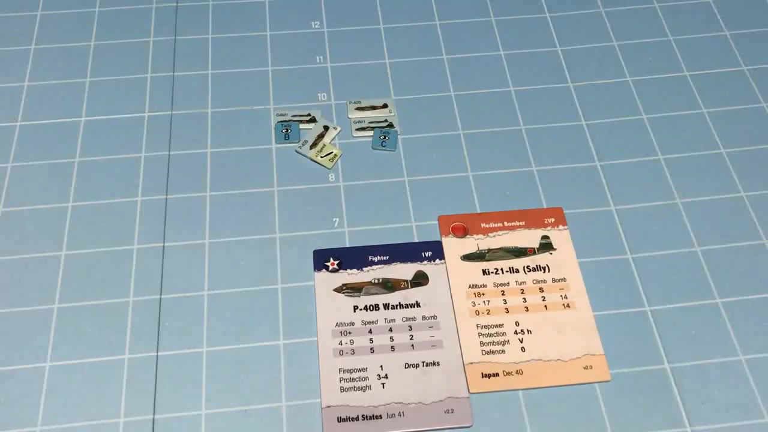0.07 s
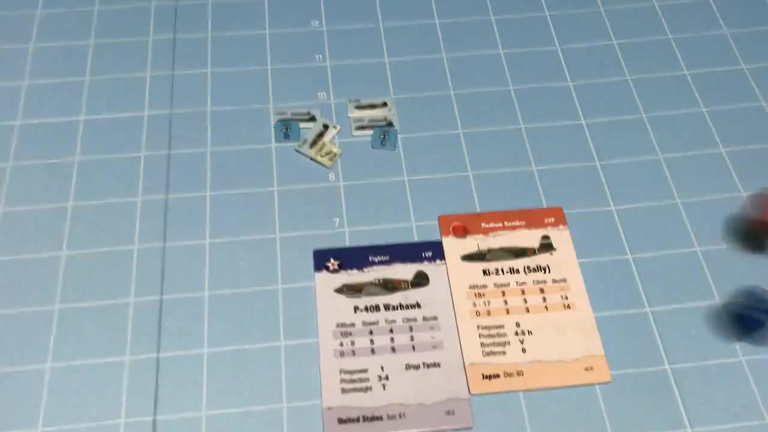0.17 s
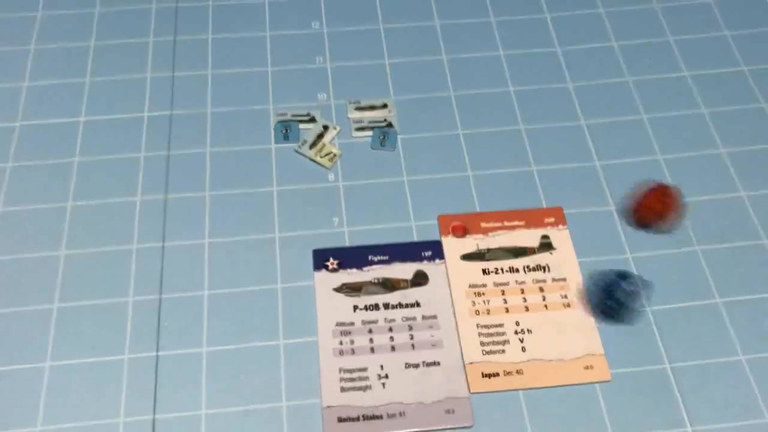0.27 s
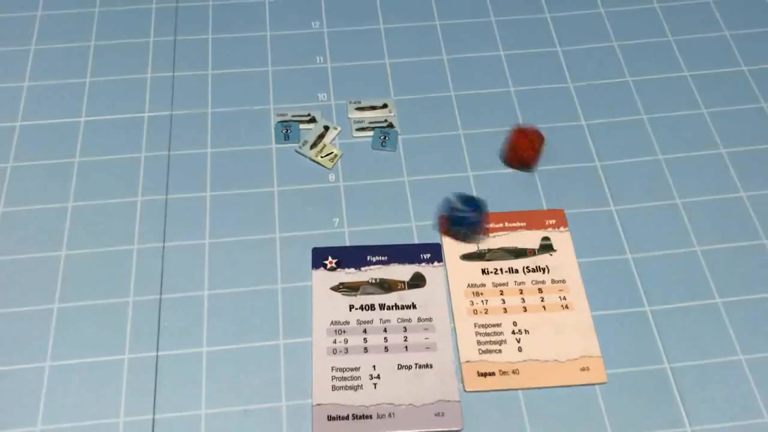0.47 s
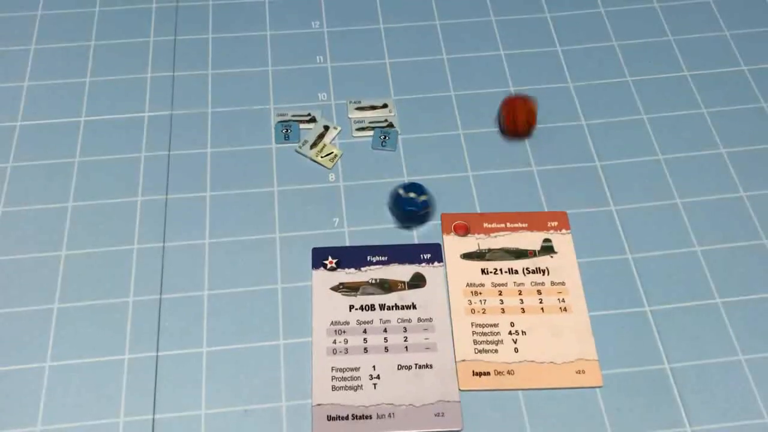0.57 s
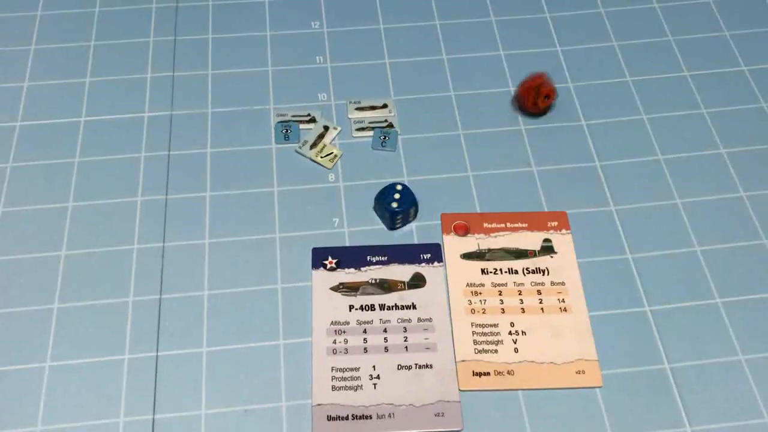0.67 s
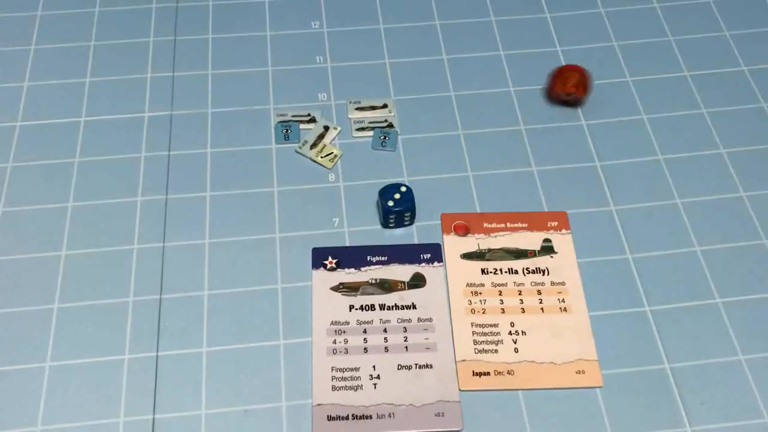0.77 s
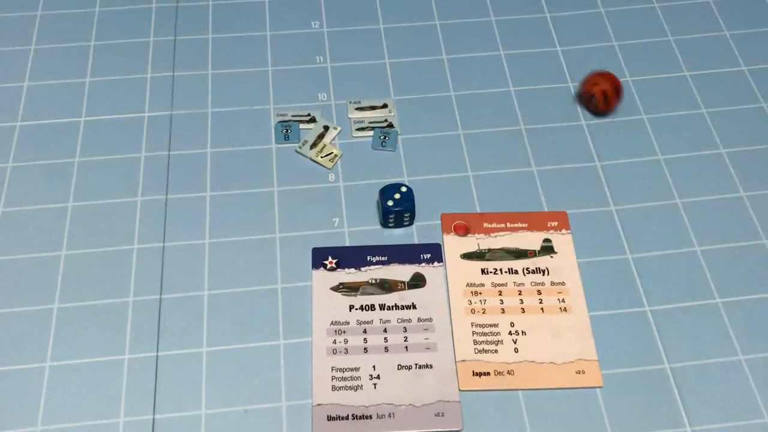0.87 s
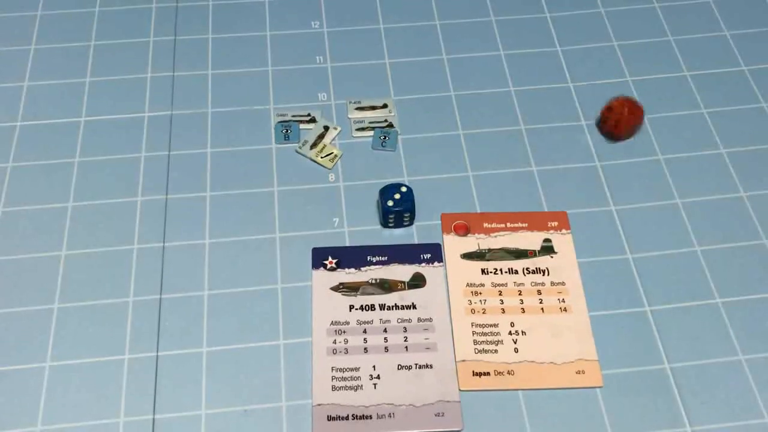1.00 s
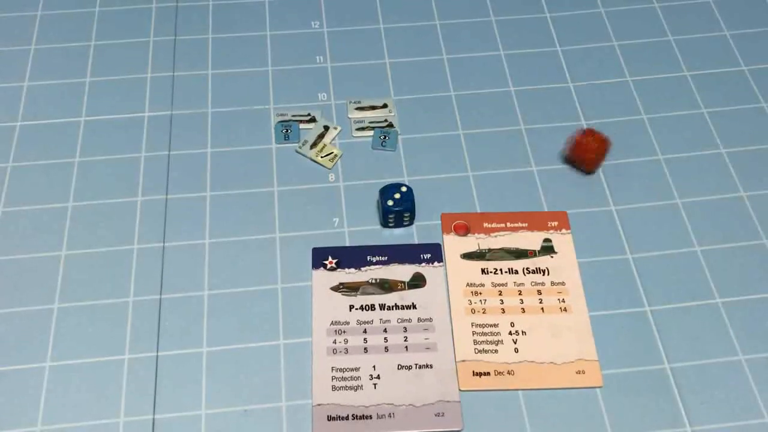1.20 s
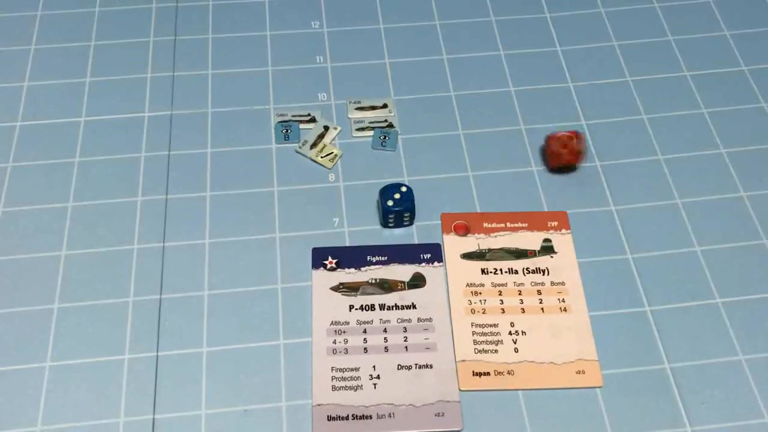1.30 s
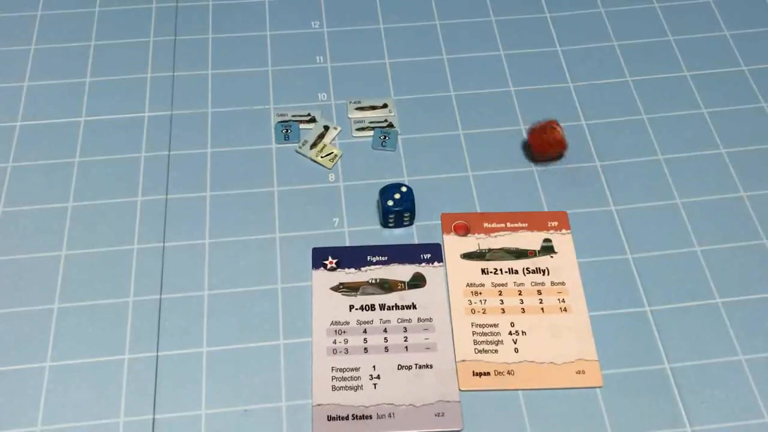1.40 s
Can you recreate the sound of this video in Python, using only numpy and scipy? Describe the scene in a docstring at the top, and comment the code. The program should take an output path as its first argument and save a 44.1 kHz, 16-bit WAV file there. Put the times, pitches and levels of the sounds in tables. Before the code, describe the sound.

Two dice click together, then bounce and tumble to rest on a table mat.

```python
"""Two plastic dice click together in a closed hand, whose cavity colours the clicks and rings on.
Thrown on a thin mat over a table, they skid, bounce with hollow knocks and tumble over their corners;
one rocks on slowly until it drops on a face. Each landing sends bending waves through the table top
and excites its low modes. A small room reflects the blows, and a faint mains hum lies under it all."""
import sys
import numpy as np
from scipy import signal
from scipy.fft import rfft, irfft
from scipy.io import wavfile

SR = 44100
rng = np.random.default_rng(int(sys.argv[2]) if len(sys.argv) > 2 else 0)


def master_out(mix):
    """Clip the mix to full scale and print it as 16-bit PCM to the path in sys.argv[1]."""
    frames = np.transpose(np.atleast_2d(mix))
    ceiling = np.clip(frames, -1, 1)
    pcm = np.round(ceiling * 32767).astype(np.int16)
    wavfile.write(sys.argv[1], SR, pcm)


N = 63945
T = np.arange(N) / SR
KNOCK_HZ, TREBLE_HZ, TOP_HZ = 900, 1432, 16400  # nominal knock pitch, corner of its tilt, band limit

# Spectrum of a knock through the mat. Each row: frequency in Hz, level in dB.
KNOCK_SPECTRUM = [(25, -36), (70, -12), (130, -16.5), (290, -9), (440, -18), (620, -9), (900, 3.5),
                  (1350, -6), (1850, -13.5), (2700, -20.5), (4500, -30.5), (8000, -38), (16000, -53)]


def undb(db):
    """Amplitude grows tenfold for every 20 dB."""
    return 10 ** (np.asarray(db) / 20)


def decay(t, t60):
    """Damping is exponential: 60 dB are lost in t60 seconds."""
    return np.exp(-np.log(1000) * t / t60)


def bin_hz(size):
    """Fourier bins lie SR / size apart; the lowest is held at 1 Hz for log axes."""
    return np.maximum(np.arange(size // 2 + 1) * SR / size, 1)


def curve(points, hz):
    """A spectral envelope runs straight between points on a log-frequency axis."""
    point_hz, point_db = np.array(points).T
    return np.interp(np.log(hz), np.log(point_hz), point_db)


def noise(points, size=2 ** 17):
    """Filtered white noise takes on the spectrum of its filter; rms 1."""
    x = irfft(rfft(rng.standard_normal(size)) * undb(curve(points, bin_hz(size))))[:N]
    return x / x.std()


def add(out, x, start):
    """Superposition: x adds to the sound from its start in seconds."""
    i = round(start * SR)
    out[i:i + len(x)] += x[:N - i]


def impact(points, shift, corner_hz, tilt_db, thud_db=0, ring_db=0, size=4096):
    """A blow is a minimum-phase pulse of peak 1; a harder contact tilts the treble up."""
    hz = bin_hz(size)
    db = curve(points, hz / shift) + tilt_db * np.log2(np.hypot(1, hz / corner_hz))
    db += thud_db * np.exp(-.5 * (np.log2(hz / 335) / 0.38) ** 2)  # hollow thud around 335 Hz
    db += ring_db * np.exp(-.5 * (np.log2(hz / shift / KNOCK_HZ) / 0.15) ** 2)
    cepstrum = irfft(np.log(undb(db)))
    cepstrum[1:size // 2] *= 2  # folding onto positive time makes the pulse causal
    cepstrum[size // 2 + 1:] = 0
    x = irfft(np.exp(rfft(cepstrum)))
    return -x / np.abs(x).max()


def room(x, tail_db, size=16384):
    """Reverberation: early reflections and a diffuse tail, new at each spot, follow the direct sound."""
    # Diffuse ring of table and room. Each row: band centre in Hz, level in dB re tail_db, t60 in seconds.
    bands = [(97.3, -7, 0.9), (298.4, -12.5, 0.239), (594, 4.5, 0.13), (880, -8.5, 0.17),
             (1623, -6.5, 0.16), (3500, -7.5, 0.15), (6500, -4, 0.14), (14700, -21, .22)]
    # Reflections from nearby surfaces. Each row: delay in seconds, level in dB.
    echoes = [(.0015, -17.5), (.0086, -29), (0.0094, -30), (0.0146, -18), (.0143, -23)]
    t, log_hz = T[:size], np.log(bin_hz(size))
    white, response = rfft(rng.standard_normal(size)), np.zeros(size)
    centres = np.log([row[0] for row in bands])
    for pick, (_, db, t60) in zip(np.eye(len(bands)), bands):
        band = irfft(white * np.interp(log_hz, centres, pick))
        envelope = decay(t, t60) * (1 - np.exp(-t / 0.0017))
        response += undb(db + tail_db) * band * envelope / np.linalg.norm(envelope)
    response[0] += 1
    for delay, db in echoes:
        response[int(delay * SR)] += undb(db)
    return signal.fftconvolve(x, response)


def clacks():
    """Brief contact of die on die gives a bright click; the hand's cavity resonates until it opens."""
    # Collisions. Each row: start in seconds, level in dB, treble tilt in dB per octave, pitch in Hz.
    collisions = [(.0006, -35.5, 1, 6250), (0.0245, -24, -1.5, 6370), (.0695, -48.5, -3, 5300),
                  (0.1081, -38.5, -7.5, 5600), (0.1892, -5, 1, 6570), (0.2323, -40, -36, 6200),
                  (.3800, -42, 4.5, 6640), (0.398, -27.5, 20, 6760)]
    # Spectra of the click, the hand's colouring and its ring. Each row: frequency in Hz, level in dB.
    plastic = [(200, -53.5), (1600, -51), (2600, -33), (3500, -21.5), (4500, -13), (6400, -4), (7900, -6.5),
               (9600, -5.5), (12200, -20), (14500, -20.5), (16000, -25)]
    hand_colour = [(1500, 2.5), (2900, 12.5), (4500, -1.5), (5800, 1), (7000, -3.5), (10000, -6),
                   (13000, -15)]
    hand_ring = [(1200, -36.5), (3000, -10), (4600, -16), (5350, -4.5), (5800, -0.5), (6400, -9.5),
                 (9000, -17), (12000, -39)]
    click_hz, hand_opens_s = 6600, .15
    enclosed = [(f, curve(plastic, f) + curve(hand_colour, f)) for f in np.geomspace(200, TOP_HZ, 64)]
    out = np.zeros(N)
    for start, db, tilt_db, hz in collisions:
        in_hand = start < hand_opens_s
        click = impact(enclosed if in_hand else plastic, hz / click_hz, click_hz, tilt_db)
        add(out, undb(db) * room(click, tail_db=-8.5), start)
        if in_hand:
            add(out, undb(db - 26.5) * noise(hand_ring) * decay(T, t60=0.2), start)
    return out


def room_tone():
    """The noise floor is a line spectrum of mains hum over the broadband rush of a quiet room."""
    # Tones of the hum. Each row: frequency in Hz, rms level in dB.
    tones = [(120, -57), (285, -66)]
    # Spectrum of the rush. Each row: frequency in Hz, relative level in dB.
    air = [(20, -22.5), (38, -12), (56, 6), (85, -7.5), (150, 1.5), (280, -10), (450, -13), (800, -19),
           (1600, -32), (4000, -36), (9000, -42.5), (16000, -41.5)]
    hum = sum(undb(db) * np.sqrt(2) * np.sin(2 * np.pi * (hz * T + rng.random())) for hz, db in tones)
    return hum + undb(-57) * noise(air)


def skids():
    """Sliding friction makes faint high swishes as a die skids over hand or mat."""
    # Slides. Each row: centre in seconds, Gaussian width in seconds, level in dB.
    slides = [(0.217, 0.019, -59.5), (0.391, .008, -56), (0.539, 0.013, -61.5), (0.568, 0.0098, -62),
              (0.631, 0.021, -63), (0.727, 0.033, -73.5)]
    # Spectrum of the friction. Each row: frequency in Hz, relative level in dB.
    friction = [(2000, 2), (3400, -14), (4600, -8), (6500, -6), (10000, -2), (14000, -6), (16000, -8.5)]
    swells = sum(undb(db) * np.exp(-.5 * ((T - centre) / width) ** 2) for centre, width, db in slides)
    return noise(friction) * swells


def rolls():
    """Rolling over rounded corners is a train of tiny impacts that swells and fades."""
    # Each row: start in seconds, length in seconds, level in dB, tilt in dB per octave, taps per second.
    runs = [(0.246, 0.025, -38, 5, 464), (0.486, 0.025, -47.5, -5.5, 336), (0.553, 0.021, -45.5, -7.5, 400),
            (.612, 0.1, -53, -2.5, 280), (0.699, 0.096, -48, -11, 150), (.812, 0.016, -49.5, 1, 494),
            (0.981, 0.026, -55, -1.5, 500), (1.082, 0.042, -57, -5, 700), (1.174, 0.033, -55, -10.5, 550),
            (1.396, .03, -65.5, -14, 440)]
    out = np.zeros(N)
    for start, length, db, tilt_db, rate in runs:
        tap_samples = np.cumsum(rng.uniform(.5, 1.5, 128)) / rate * SR
        tap_db = 4 * rng.standard_normal(128)
        n = int(length * SR)
        live = tap_samples < n
        taps = np.zeros(n)
        taps[tap_samples[live].astype(int)] = undb(tap_db[live])
        swell = np.sin(np.pi * np.arange(n) / n)
        tap = bending_waves(impact(KNOCK_SPECTRUM, 0.98, TREBLE_HZ, tilt_db, thud_db=1.0))
        roll = room(signal.fftconvolve(taps * swell, tap), tail_db=1)
        add(out, undb(db) * roll / np.sqrt(np.sum(roll ** 2) / n + 1e-12), start)
    return out


def bending_waves(x):
    """Dispersion in the table top: the highs arrive first, so a blow becomes a quick downward chirp."""
    hz = np.arange(len(x) // 2 + 1) * SR / len(x)
    # Each face and corner of a die colours the treble by chance, in steps of 700 Hz.
    colour_db = 3 * np.interp(hz / 700, np.arange(64), rng.standard_normal(64))
    treble = hz ** 2 / (hz ** 2 + (2 * TREBLE_HZ) ** 2)
    lag_s = 0.00072  # scale of the group delay, which falls as 1 / sqrt(frequency)
    advance_s = lag_s * np.sqrt(KNOCK_HZ / TOP_HZ) / 2
    phase = 2 * np.pi * (2 * lag_s * np.sqrt(hz * KNOCK_HZ) - hz * advance_s)
    return irfft(rfft(x) * undb(colour_db * treble) * np.exp(-1j * phase))[:len(x) // 2]


def knocks():
    """Impact excitation: each landing knocks, crunches the grain of the mat and sets the table ringing."""
    # Landings. Each row: start in seconds, level in dB, treble tilt in dB per octave,
    # hollow thud in dB, pitch in Hz, boost at that pitch in dB.
    landings = [(0.2533, -8, 0.5, 3.5, 950, 0), (.2931, -4.5, 2, 2, 901, 1), (.2957, -48, 2, 12, 940, 0),
                (0.3345, -9.5, -0.5, -2.5, 924, -2.5), (0.388, -15.5, -1, 2.5, 904, -2.5),
                (0.3991, -26.5, 5.5, 23, 833, -9), (0.4298, -11, -.5, 4, 904, 0),
                (0.4994, -36.5, -8, -27, 1000, 1), (0.5636, -32.5, -0.5, 10, 1100, 11.5),
                (0.6053, -26, 1.5, 3, 850, 4), (.6390, -30, 0.5, -19, 843, 3.5),
                (0.6425, -28, -0.5, 2.5, 924, 2.5), (0.6578, -38.5, -2, 17, 840, 5),
                (0.6764, -30.5, 0, -0.5, 890, -1), (.6791, -31.5, -1, -25, 860, 3),
                (0.7057, -29.5, 1, 0, 860, 2), (0.7263, -34, -9, -12, 1030, 1),
                (0.7302, -34, -2, 11, 1030, 6), (.7722, -41.5, 3.5, 14, 827, 9),
                (0.8227, -42, 2, -7.5, 1050, -4), (0.9034, -29, -0.5, 19.5, 1010, -3),
                (0.986, -37, -3.5, 17.5, 910, -2), (1.1900, -44, -3.5, 20.5, 960, -9.5),
                (1.2872, -25.5, -1, 11.5, 873, 3.5), (1.3875, -51, -24.5, 16, 992, 1),
                (1.4092, -48.5, -18, 8, 838, -1)]
    # Spectrum of the mat's crunch. Each row: frequency in Hz, relative level in dB.
    grain = [(500, -9.5), (2000, -5), (4500, -4.5), (7000, -5), (10000, -10), (16000, -13)]
    out = np.zeros(N)
    for start, db, tilt_db, thud_db, hz, ring_db in landings:
        knock = bending_waves(impact(KNOCK_SPECTRUM, hz / KNOCK_HZ, TREBLE_HZ, tilt_db, thud_db, ring_db))
        n = len(knock)
        crunch = undb(-30 + 2 * tilt_db) * noise(grain, n) * np.exp(-T[:n] / 0.0014)
        add(out, undb(db) * room(knock + crunch, tail_db=-2.5), start)
        add(out, undb(db) * table_ring(), start)
    return out


def table_ring(size=16384):
    """Free vibration of the table top is a sum of damped modes, slightly detuned at each blow."""
    # Modes. Each row: frequency in Hz, level in dB relative to the blow, t60 in seconds.
    modes = [(62, -43, .28), (125, -42.5, 0.6), (164, -28, 0.091), (300.2, -31.5, 0.22), (583, -28, 0.088),
             (858, -35.5, 0.3), (926, -40.5, 0.059)]
    t = T[:size]
    detunings = 1 + 0.016 * rng.standard_normal(len(modes))
    return sum(undb(db) * np.sin(2 * np.pi * hz * detune * t) * decay(t, t60)
               for (hz, db, t60), detune in zip(modes, detunings))


def thin_ring(tumbling):
    """Forced resonance: for part of the tumble, the blows drive one high, quickly dying mode."""
    mode_hz, start_s, end_s = 4440, 0.48, 0.80
    envelope = decay(T, t60=.005)
    mode = 2 * envelope * np.sin(2 * np.pi * mode_hz * T) / envelope.sum()
    drive = np.diff(tumbling, prepend=0) * (T > start_s) * (T < end_s)
    return undb(8) * signal.fftconvolve(drive, mode)[:N]


def scene():
    """The pressures of all sources add linearly in one channel."""
    tumbling = knocks() + rolls()
    return (tumbling + thin_ring(tumbling) + clacks() + skids() + room_tone())[None]


def record(dry):
    """Band limiting: a gentle high-pass thins the deep bass and a steep low-pass cuts the top."""
    thinned = signal.sosfilt(signal.butter(2, 34, "high", fs=SR, output="sos"), dry)
    return signal.sosfilt(signal.ellip(8, .2, 70, TOP_HZ, fs=SR, output="sos"), thinned)


dry = scene()
out = record(dry)
master_out(out)
```